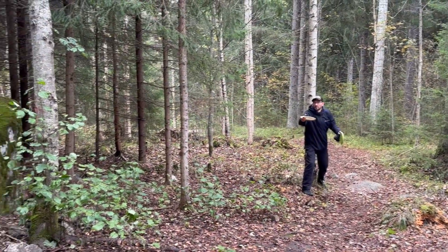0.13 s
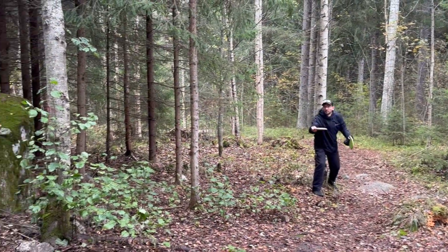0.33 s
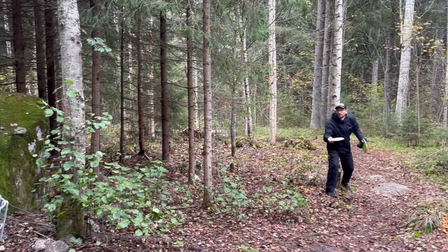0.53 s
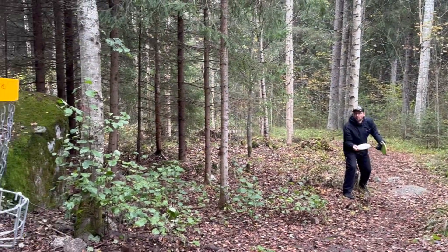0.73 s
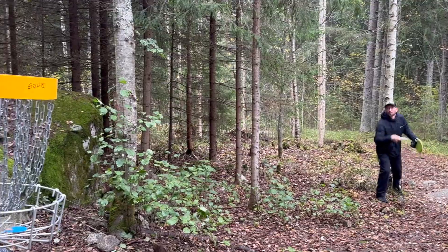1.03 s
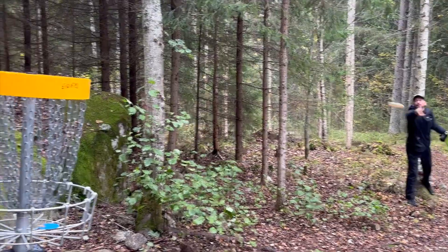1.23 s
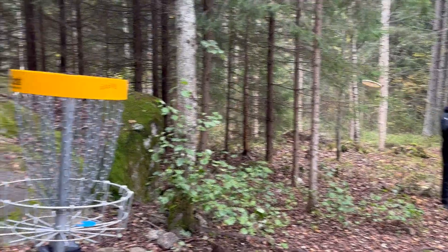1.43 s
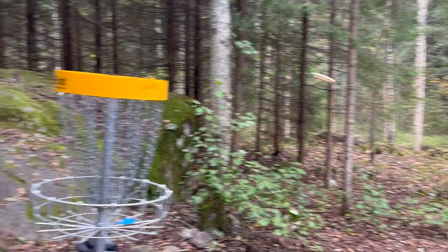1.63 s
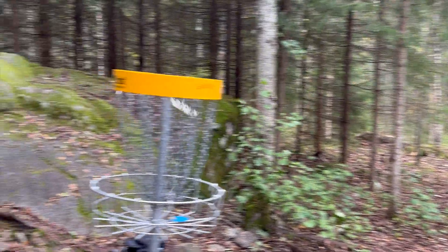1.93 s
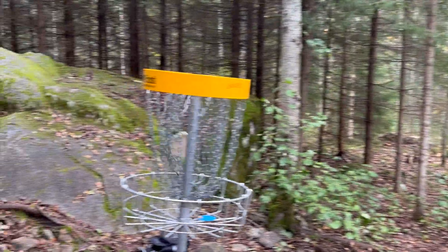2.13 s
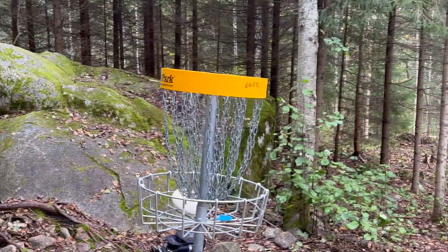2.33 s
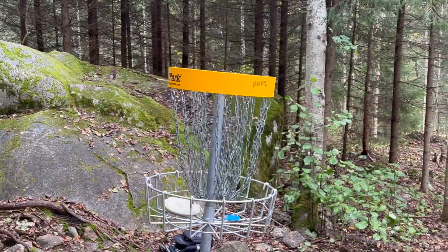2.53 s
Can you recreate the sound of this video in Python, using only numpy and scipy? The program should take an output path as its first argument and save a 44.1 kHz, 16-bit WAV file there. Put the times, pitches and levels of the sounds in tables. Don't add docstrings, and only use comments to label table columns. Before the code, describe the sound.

A plastic disc crashes into hanging basket chains with a bright metallic clash and jingle in quiet woods.

```python
import sys
import numpy as np
from scipy import signal
from scipy.fft import rfft, irfft
from scipy.io import wavfile

SR = 44100
rng = np.random.default_rng(int(sys.argv[2]) if len(sys.argv) > 2 else 0)


def wrap_up_sound(samples):
    columns = np.atleast_2d(samples).T
    tamed = np.clip(columns, -1, 1)
    steps = np.round(tamed * 32767).astype(np.int16)
    wavfile.write(sys.argv[1], SR, steps)


def convert_level_to_amplitude(level_db):
    exponent = np.asarray(level_db, float) / 20
    return 10 ** exponent


N = 119070


def rms_one(x):
    return x / np.sqrt(np.mean(x ** 2) + 1e-20)


def in_time(rows, before=None):
    s, value = np.transpose(rows)
    return np.interp(np.arange(N) / SR, s, value, left=before)


def at_hz(points, hz):
    p = np.array(points)
    return np.interp(np.log(hz), np.log(p[:, 0] + 1), p[:, 1])


def fft_hz():
    return np.arange(N // 2 + 1) * SR / N + 1


def coloured(x, points):
    return irfft(rfft(x) * convert_level_to_amplitude(at_hz(points, fft_hz())), N)


def band(x, low_hz, high_hz, order=1):
    return signal.sosfilt(signal.butter(order, [low_hz, high_hz], "band", fs=SR, output="sos"), x)


def ring(hits, hz, t60):
    r, w = convert_level_to_amplitude(-60 / (t60 * SR)), 2 * np.pi * hz / SR
    return signal.lfilter([0, np.sin(w)], [1, -2 * r * np.cos(w), r * r], hits + 1e-18)


def burst(t60):
    t = np.arange(SR // 5) / SR
    return rng.standard_normal(len(t)) * convert_level_to_amplitude(-60 * t / t60)


def drift(rate_hz):
    r = np.exp(-80 * np.pi * rate_hz / SR)
    noise = rng.standard_normal(N // 40 + 2002)
    slow = signal.lfilter([1], [1, -2 * r, r * r], noise)[2000:]
    return np.interp(np.arange(N) / 40, np.arange(len(slow)), rms_one(slow))


def contacts(per_s):
    spread_db = 3
    chance, size, sign = rng.random((3, N))
    height = convert_level_to_amplitude(spread_db * np.minimum(-np.log(size + 1e-9), 4))
    return (chance < per_s / SR) * height * np.sign(sign - .5)


def drone():
    # (time [s], level [dB])
    drone_level = [
        (0, -55.5),
        (.08, -50.5),
        (.5, -62),
        (1.1, -65.5),
        (1.74, -73),
        (1.88, -55),
        (2.7, -60.5),
    ]
    tone_hz, width_hz, octave_db = 69.94, 3.1, -15
    t60 = 2.2 / width_hz

    def tone(k):
        once = ring(rng.standard_normal(N + SR), k * tone_hz, t60 / k)
        twice = ring(once, k * tone_hz, t60 / k / 2)
        return rms_one(twice[SR:])

    return convert_level_to_amplitude(in_time(drone_level)) * (tone(1) + convert_level_to_amplitude(octave_db) * tone(2))


def whine():
    start_s, end_s, hz, level_db = -0.8, 1.5, 1600, -79.5
    progress = np.clip((np.arange(N) / SR - start_s) / (end_s - start_s), 0, 1)
    return convert_level_to_amplitude(level_db) * np.sin(np.pi * progress) * rms_one(ring(rng.standard_normal(N), hz, .08))


def air():
    # (frequency [Hz], density [dB per Hz])
    air_colour = [(30, -7.5), (70, -4), (140, -12), (600, -18), (1300, -26), (5000, -29), (10300, -27.5),
                  (12500, -41), (16300, -32)]
    # (frequency [Hz], level [dB])
    side_colour = [(60, -15), (200, -13), (700, 1.5), (1300, -6.5), (2400, -25), (5000, -16)]
    # (centre [s], length [s], swell [dB])
    rustles = [
        (1.184, 0.08, 6),
        (1.582, 0.23, 2.5),
    ]
    level_db, patchy_db = -62, 0.65
    mid, side = (coloured(rng.standard_normal(N), air_colour) for _ in range(2))
    t = np.arange(N) / SR
    swell_db = sum(db * np.exp(-((t - s) / length) ** 2) for s, length, db in rustles)
    gain = convert_level_to_amplitude(level_db + patchy_db * (drift(2.1) + drift(22))) / np.std(mid)
    leaves = band(mid, 200, 4000) * (convert_level_to_amplitude(swell_db) - 1)
    return gain * (mid + leaves), gain * coloured(side, side_colour)


def ticks():
    # (time [s], peak [dB], centre [Hz], brightness [dB])
    snaps = [(.0712, -45, 6000, -1), (0.1291, -53.5, 4500, 0), (0.1494, -47, 1090, 3.5),
             (.158, -48, 1100, -3), (.183, -46, 5000, 0), (.2593, -51.5, 1600, 7.5), (0.409, -54, 1530, -8),
             (0.4304, -48, 5950, -6), (.6165, -51, 3540, 1), (1.0074, -46.5, 2200, 4),
             (1.14, -50, 6840, -1), (1.401, -38.5, 2420, -19), (1.4626, -50, 2800, -12),
             (1.51, -40.5, 2550, -6), (1.515, -43, 2900, -12), (1.53, -40, 2110, -14),
             (1.5638, -40.5, 2620, -5), (1.576, -47.5, 3200, -10), (1.61, -43, 9700, -6),
             (1.7927, -40.5, 2900, -21), (1.841, -47.5, 2400, -12)]
    t60_s, body_db, broad_db, cut_hz = 0.014, -2, 2, 8700
    out = np.zeros(N)
    for s, db, hz, bright_db in snaps:
        puff, i = burst(t60_s), int(s * SR)
        body = band(puff, hz / 1.32, min(hz * 1.21, 19000))
        body = convert_level_to_amplitude(body_db) * body / np.abs(body).max() * 2
        broad = convert_level_to_amplitude(broad_db + bright_db) * signal.lfilter(*signal.butter(1, cut_hz, fs=SR), puff)
        out[i:i + len(puff)] += convert_level_to_amplitude(db - 8.0) * (body + broad)
    return out


def shaking():
    # (time [s], clatter level [dB])
    shake_level = [(1.957, -27), (1.978, -27.5), (1.994, -31.5), (2.014, -29), (2.06, -31.5), (2.11, -29.5),
                   (2.135, -28), (2.15, -41), (2.19, -44), (2.25, -53.5), (2.3, -37), (2.31, -34),
                   (2.378, -36), (2.392, -30), (2.414, -35.5), (2.5, -38.5), (2.533, -45.5), (2.545, -39),
                   (2.59, -48), (2.64, -51.5), (2.7, -47.5)]
    settle_db_per_s = 89
    shake_db = in_time(shake_level, before=-150)
    fall = settle_db_per_s * np.arange(N) / SR
    return convert_level_to_amplitude(shake_db), convert_level_to_amplitude(np.maximum.accumulate(shake_db + fall) - fall)


def clatter(shake, swing):
    # (frequency [Hz], density [dB per Hz])
    clatter_colour = [(150, -5), (500, -10.5), (1200, -4), (3000, 4.5), (4500, -2.5), (8000, 4.5),
                      (12000, -2.5), (16000, -5.5)]
    contacts_per_s, level_db, treble_hz = 26000, 7, 8480
    grain_cycles, grain_t60_s, treble_t60_s = 130, 0.047, 0.038
    low = np.geomspace(200, treble_hz, 70)
    high = np.linspace(treble_hz, 15800, 71)[1:]
    pitches = np.r_[low, high]
    steps = np.gradient(pitches)
    hits = contacts(contacts_per_s)
    dealt = rng.integers(0, 140, N)
    out = 0
    for k, hz in enumerate(pitches * rng.uniform(1.0, 1.005, 140)):
        fine = k >= 70
        t60 = treble_t60_s if fine else min(grain_t60_s, grain_cycles / hz)
        force = swing if fine else shake
        gain = convert_level_to_amplitude(at_hz(clatter_colour, hz)) * (steps[k] / t60) ** .5
        out = out + gain * ring(force * hits * (dealt == k), hz, t60)
    return convert_level_to_amplitude(level_db) * out * np.std(shake) / np.std(out)


def cracks():
    # (time [s], peak [dB], centre [Hz])
    crack_hits = [(1.9583, -16.5, 3000), (1.9653, -12.5, 4570), (1.973, -18.5, 1200), (2.0735, -22, 4000),
                  (2.1053, -10.5, 4230), (2.119, -11, 4000), (2.137, -19.5, 3000), (2.2786, -30, 3000),
                  (2.307, -22, 1790), (2.3908, -17, 3500), (2.4248, -23, 2800), (2.493, -36, 2500),
                  (2.539, -22.5, 4520)]
    t60_s, width = 0.022, 1.41
    out = np.zeros(N + SR)
    for s, db, hz in crack_hits:
        puff, i = band(burst(t60_s), hz / width, hz * width), int(s * SR)
        out[i:i + len(puff)] += convert_level_to_amplitude(db) * puff / np.abs(puff).max()
    return out[:N]


def knocks():
    # (time [s], peak [dB], sway of the pole [dB], pitch struck most [Hz])
    knock_hits = [(1.959, -25.5, -9, 790), (1.971, -23, -4, 594), (2.006, -23.5, -22, 1000),
                  (2.019, -29, 1.5, 625), (2.045, -30, -16, 1250), (2.105, -45, -19, 930),
                  (2.128, -25, -17.5, 210), (2.159, -36, 1.5, 230), (2.307, -21.5, -16, 400),
                  (2.316, -24, -22, 920), (2.344, -26.5, -21, 480), (2.398, -26, -27, 302),
                  (2.418, -30.5, -19, 796), (2.441, -26.5, -4.5, 780), (2.531, -35, -23, 790),
                  (2.586, -34, -12, 804), (2.628, -28, -16, 805), (2.636, -33.5, -4, 350)]
    # (frequency [Hz], level [dB], t60 [s])
    disc_modes = [(210, 1, 0.076), (256.4, -4.5, 0.11), (381, -1, 0.092), (568, -0.5, 0.06),
                  (629, -2.5, 0.049), (795, 2, 0.069), (893, -4.5, 0.1), (1094, 3, 0.067),
                  (1288, -11, 0.17), (1587, 4.5, 0.19)]
    # (frequency [Hz], level [dB], t60 [s])
    pole_modes = [(50.55, -2.5, 0.96), (72, -7, 0.23), (101, -3, 0.14)]
    noise_db, noise_t60_s, noise_cut_hz, focus_db = -1.5, 0.14, 2200, 12.5
    out = np.zeros(N + SR)
    s, db, sway_db, hz_hit = np.transpose(knock_hits)
    at = (s * SR).astype(int)
    for i, level_db in zip(at, db):
        puff = band(burst(noise_t60_s), 120, noise_cut_hz, order=2)
        out[i:i + len(puff)] += convert_level_to_amplitude(level_db + noise_db) * puff
    out = out[:N]
    for modes, gain_db, focus in ((disc_modes, db - 10, focus_db), (pole_modes, db + sway_db - 7, 0)):
        spread_db = rng.normal(0, 3.1, (len(s), len(modes)))
        for k, (hz, level_db, t60) in enumerate(modes):
            octaves_off = np.minimum(np.abs(np.log2(hz / hz_hit)), 1.5)
            hit = np.zeros(N)
            hit[at] = convert_level_to_amplitude(gain_db + level_db + spread_db[:, k] - focus * octaves_off)
            out += ring(hit, hz, t60)
    return out


def link_family(modes, clashes, jingle_db, force):
    jingles_per_s, clash_span_s, reach, clash_db = 1500, .006, 0.011, -10.5
    detune, loose_t60_s, loose_gain_db, contact_t60_s = 0.003, .07, 2, 0.0041
    s, db, hz_hit = np.transpose(clashes)
    delay = clash_span_s * rng.random((len(s), 4)) * np.sign(np.arange(4))
    at = ((s[:, None] + delay) * SR).astype(int)
    out = 0
    for hz, level_db, t60 in modes:
        near_db = np.maximum(-6 * ((hz / hz_hit - 1) / reach) ** 2, -14)
        loose_hz = hz * (1 + detune * rng.normal())
        for pitch, life, loose_db in ((hz, t60, 0), (loose_hz, loose_t60_s, loose_gain_db)):
            hit = 0.048 * convert_level_to_amplitude(jingle_db + level_db) * force * contacts(jingles_per_s)
            size = convert_level_to_amplitude(db + clash_db + level_db * 0.68 + near_db + loose_db)[:, None]
            size = size * rng.uniform(0.49, 1, at.shape) * 0.71 ** np.arange(4)
            np.add.at(hit, at, size * rng.choice([-1, 1], at.shape))
            soft = ring(hit, pitch, contact_t60_s) * 2 * np.log(1000) / (contact_t60_s * SR)
            out = out + ring(soft, pitch, life)
    return out


def links(shake, swing):
    # (frequency [Hz], level [dB], t60 [s])
    low_modes = [(1604, -14, 0.085), (1955, 1.5, 0.13), (2022, -1.5, 0.69)]
    mid_modes = [(5420, -7, 0.12), (5500, -4.5, 0.13), (5545, -2, 0.44), (5610, -3, 0.17),
                 (5586, -7, 0.086), (5730, 1, 0.2), (5780, -6, 0.1)]
    high_modes = [(10060, -12, 0.096), (10400, -6, 0.14), (10460, -7, 0.36), (10370, -3, 0.13),
                  (10560, -1.5, 0.33), (10690, -4, 0.19), (10570, -1, 0.22), (10708, -6, 0.13),
                  (11360, -7, .12), (11170, -1, 0.15), (11300, -1.5, 0.16), (11440, -6, 0.12),
                  (12250, -7, 0.13), (12080, -8, .13)]
    # (time [s], peak [dB], pitch struck most [Hz])
    low_clashes = [(2.0144, -35, 2060), (2.046, -23, 2020), (2.0657, -22.5, 1950), (2.074, -16, 1955),
                   (2.09, -17, 1955), (2.111, -9.5, 1947), (2.125, -19.5, 1960), (2.169, -25.5, 2022),
                   (2.187, -20.5, 2022), (2.204, -19.5, 2022), (2.2887, -30, 1992), (2.3067, -31, 2050),
                   (2.3626, -41, 1970), (2.3835, -30, 1946), (2.42, -32.5, 2020)]
    mid_clashes = [(1.9667, -12.5, 5576), (2.0125, -10.5, 5570), (2.0293, -14.5, 5580),
                   (2.0636, -10.5, 5540), (2.077, -13.5, 5540), (2.085, -9.5, 5547), (2.106, -4, 5500),
                   (2.118, -7, 5527), (2.1414, -11, 5623), (2.154, -9, 5500), (2.2138, -18.5, 5600),
                   (2.2327, -26, 5510), (2.2888, -22.5, 5514), (2.383, -18, 5570), (2.3902, -10, 5600),
                   (2.407, -21, 5630), (2.4546, -30, 5590), (2.4915, -24, 5610), (2.539, -18, 5580),
                   (2.5436, -19, 5614), (2.611, -31, 5570)]
    high_clashes = [(1.9603, -30, 10870), (1.9688, -26, 10960), (1.9763, -17, 10560), (2.0062, -6.5, 10540),
                    (2.0461, -10, 10490), (2.0641, -9.5, 10580), (2.07, -10, 11280), (2.087, -4.5, 10400),
                    (2.1025, -6.5, 10660), (2.1259, -6, 10570), (2.1514, -13.5, 10500),
                    (2.1798, -12, 10550), (2.1893, -9.5, 10600), (2.2202, -9.5, 10640), (2.2796, -9, 10470),
                    (2.295, -10, 10530), (2.3484, -15, 10500), (2.35, -18.5, 11300), (2.3714, -13, 10610),
                    (2.3868, -13, 10500), (2.4662, -18, 10570), (2.4961, -17.5, 10520), (2.541, -14, 10540),
                    (2.541, -20, 11250), (2.606, -22, 10700), (2.6133, -18.5, 10580), (2.6133, -17, 11550),
                    (2.6772, -28, 10730)]
    return (link_family(low_modes, low_clashes, -5, shake)
            + link_family(mid_modes, mid_clashes, -5.5, shake)
            + link_family(high_modes, high_clashes, 8, swing))


def tray():
    # (frequency [Hz], level [dB], t60 [s])
    wires = [(396.3, -3, 0.18), (476, 3, 0.22), (845, -6, 0.24), (915, -2, 0.17), (1308, -4.5, 0.22)]
    start_s, rise_s, fade_db_per_s, level_db, touches_per_s = 2.31, 0.03, 48, -51.5, 400
    after = np.arange(N) / SR - start_s
    wobble = np.clip(after / rise_s, 0, 1) * convert_level_to_amplitude(-fade_db_per_s * np.abs(after))
    return sum(convert_level_to_amplitude(level_db + db) * ring(wobble * contacts(touches_per_s), hz, t60)
               for hz, db, t60 in wires)


def trees(x):
    level_db, t60_s, cut_hz = -18, 1, 1830
    t = np.arange(SR // 2) / SR
    tail = rng.standard_normal(len(t)) * convert_level_to_amplitude(-60 * t / t60_s) * (t > .004)
    tail = signal.sosfilt(signal.butter(1, cut_hz, fs=SR, output="sos"), tail)
    return convert_level_to_amplitude(level_db) * signal.fftconvolve(x, tail / np.sqrt(np.sum(tail ** 2)))[:N]


def scene():
    left_right = np.array([[1], [-1]])
    drone_side_db, knock_pan_db = -18.5, -0.06
    shake, swing = shaking()
    basket = clatter(shake, swing) + cracks() + links(shake, swing)
    thuds = knocks() + tray()
    mid, side = air()
    side = side + convert_level_to_amplitude(drone_side_db) * drone()
    bed = ticks() + whine() + drone() + mid + side * left_right
    return basket + trees(basket + thuds) + thuds * convert_level_to_amplitude(knock_pan_db * left_right) + bed


def low_pass(x):
    return signal.sosfilt(signal.butter(12, 16570, fs=SR, output="sos"), x)


def record(dry):
    # (frequency [Hz], phase [rad])
    port_phase = [(10, .15), (200, .24), (1200, .28), (1600, 0), (2600, .1), (3100, .6), (3900, 0),
                  (6800, .05), (7200, 1.3), (7800, 3.1), (8650, 3.1), (9300, 1.7), (10000, .85),
                  (10800, .7), (11400, 0), (13600, 0), (14000, -.8), (16000, -2.8)]
    top = 0.99
    turn = np.exp(.5j * at_hz(port_phase, fft_hz()) * [[1], [-1]])
    dry = signal.sosfilt(signal.butter(3, 40, "high", fs=SR, output="sos"), dry)
    dry = top * np.tanh(dry / top)
    dry = signal.sosfilt(signal.cheby2(20, 40, 16500, fs=SR, output="sos"), dry)
    mix = irfft(rfft(dry) * turn, N)
    return low_pass(mix)


dry = scene()
out = record(dry)
wrap_up_sound(out)
```